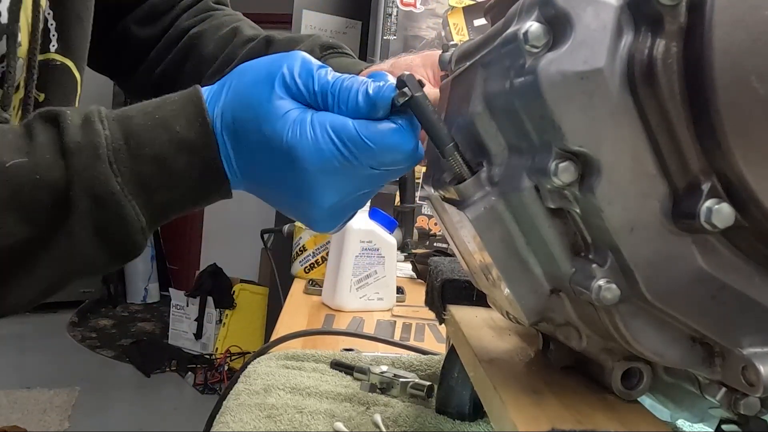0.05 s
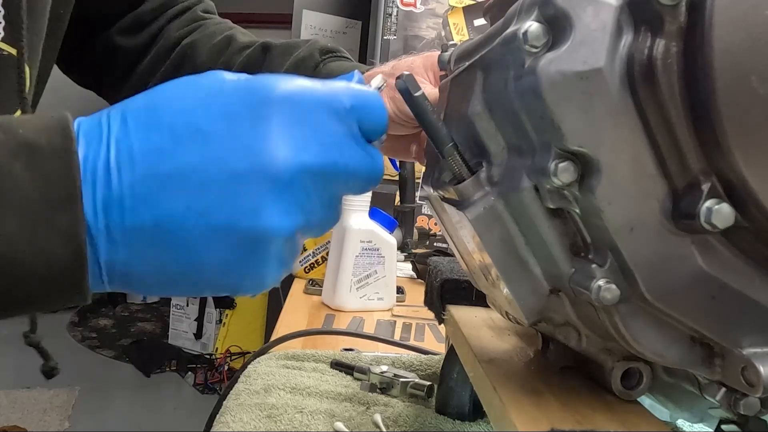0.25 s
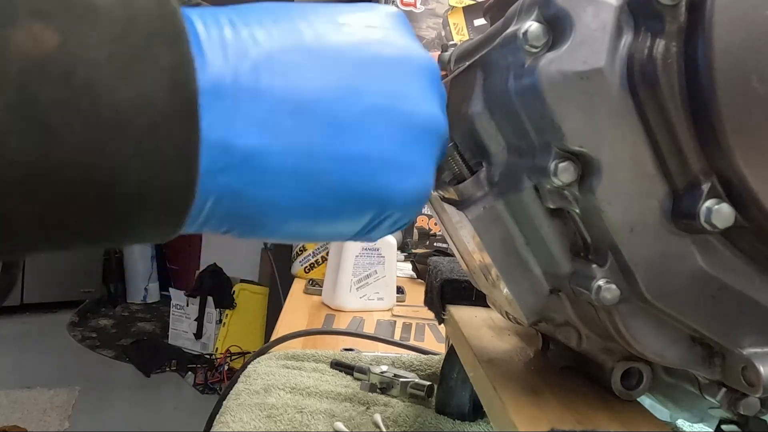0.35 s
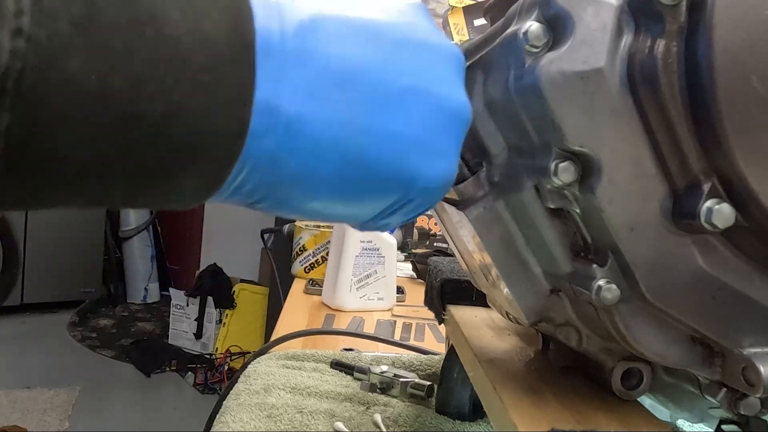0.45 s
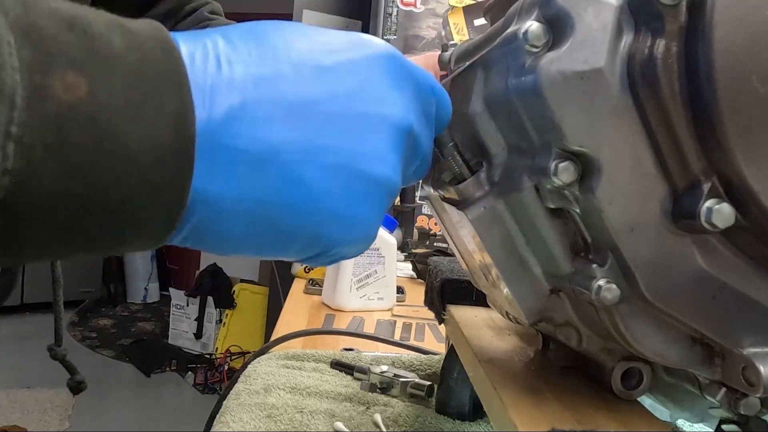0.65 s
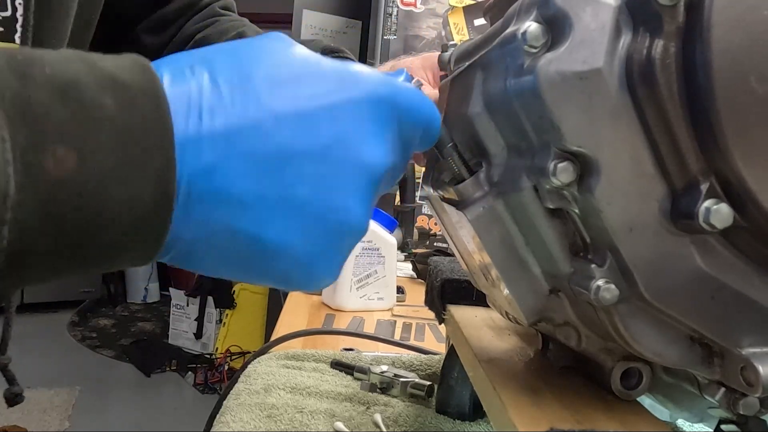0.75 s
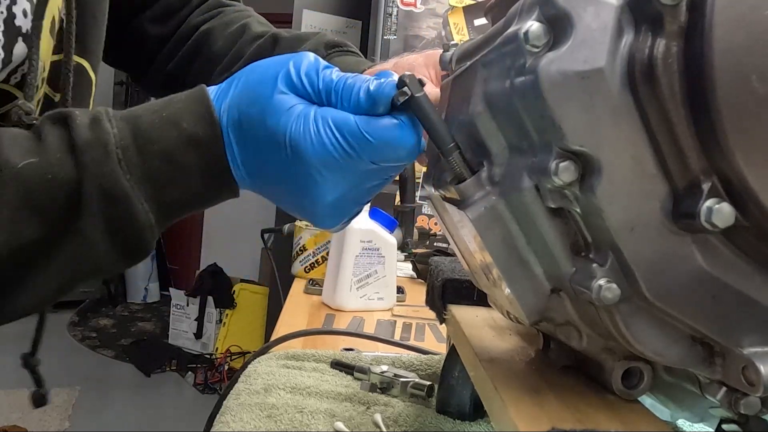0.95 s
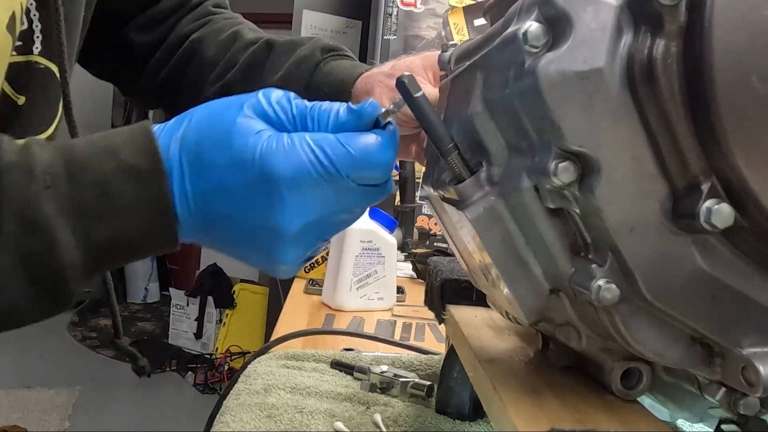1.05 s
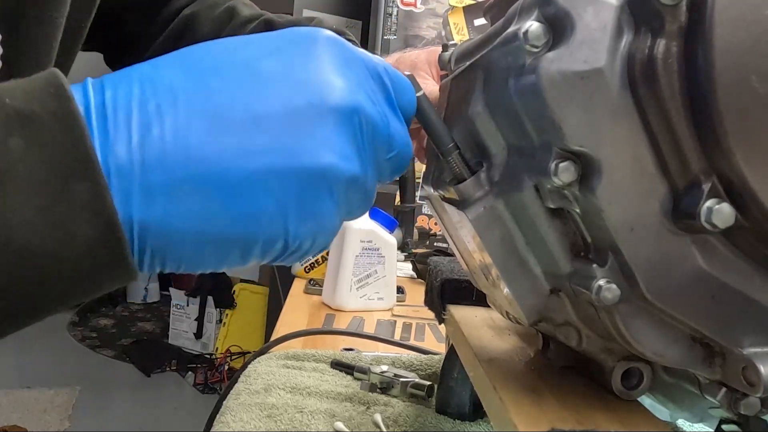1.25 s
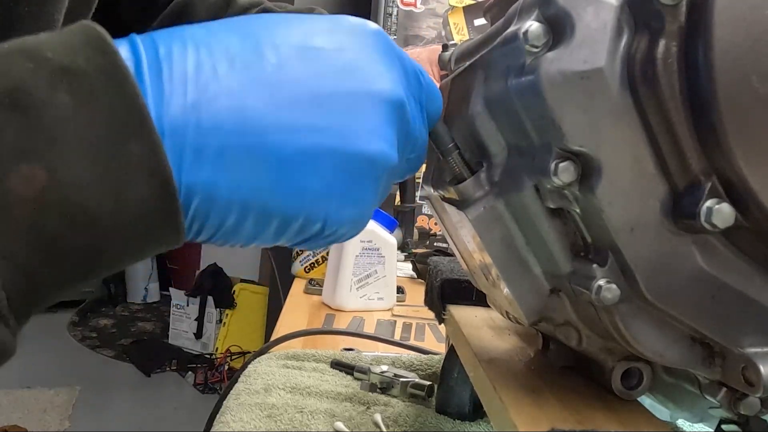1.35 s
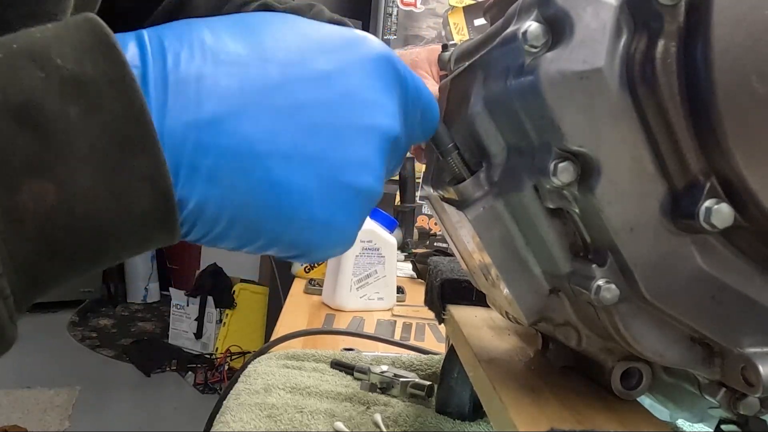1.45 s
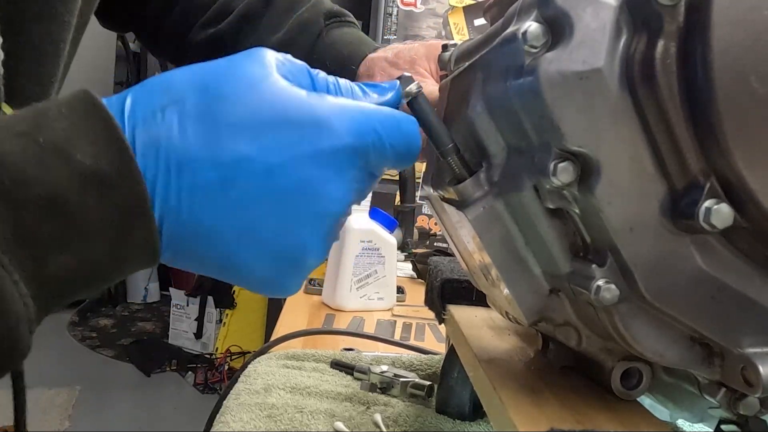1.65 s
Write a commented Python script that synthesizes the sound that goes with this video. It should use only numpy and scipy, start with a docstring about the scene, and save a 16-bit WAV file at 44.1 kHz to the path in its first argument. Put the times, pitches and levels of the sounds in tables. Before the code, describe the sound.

A steel tool clicks, scrapes and briefly squeaks as it turns in a metal casing.

```python
"""A small, quiet workshop: a gloved hand turns a steel tool in an aluminium engine casing on the bench.
Heard close up, the loose tool clicks against its seat, scrapes, skids, and squeaks as it sticks and slips;
the hand damps its ring. The casing answers with dull knocks and the shifting grip hisses softly.
Short room echo, faint air and a low rumble lie behind."""
import sys
import numpy as np
from scipy import signal
from scipy.fft import rfft, irfft, next_fast_len
from scipy.io import wavfile
from scipy.ndimage import uniform_filter1d, map_coordinates

SR = 44100
rng = np.random.default_rng(int(sys.argv[2]) if len(sys.argv) > 2 else 0)


def wav_out(sig):
    """Save sig, one row per channel (or a flat mono array), as 16-bit PCM at SR to the path in sys.argv[1]."""
    wavfile.write(sys.argv[1], SR, np.round(np.clip(np.atleast_2d(sig).T, -1, 1) * 32767).astype(np.int16))


N = 74970

# Spectrum of the contact crack. Each row: frequency in Hz, level in dB.
CRACK_SPECTRUM = [(300, -29.5), (1500, -22.5), (1950, -23.5), (2600, -14.5), (3450, -14.5), (5500, -4.5),
                  (7500, -0.5), (10000, 2), (12700, -1), (13600, -1.5), (15200, -3.5)]


def undb(db):
    """Decibels to gain."""
    return 10 ** (np.asarray(db) / 20)


def unit(x):
    """Scale to rms 1."""
    return x / np.sqrt(np.mean(x ** 2) + 1e-20)


def seconds(length_s):
    """Time axis."""
    return np.arange(int(length_s * SR)) / SR


def decay(t, t60_s):
    """Fall by 60 dB in t60_s."""
    return np.exp(-np.log(1000) * t / t60_s)


def colour(x, points):
    """Minimum-phase filter with the given (Hz, dB) response."""
    hz, db = np.array(points, float).T
    size = 2 * next_fast_len(len(x))
    bins_hz = np.maximum(np.fft.rfftfreq(size, 1 / SR), 1)
    cepstrum = irfft(np.log(undb(np.interp(np.log(bins_hz), np.log(hz), db))))
    cepstrum[1:size // 2] *= 2
    cepstrum[size // 2 + 1:] = 0
    return irfft(rfft(x, size) * np.exp(rfft(cepstrum)))[:len(x)]


def noise(points, size):
    """Coloured noise of rms 1."""
    return unit(colour(rng.standard_normal(size), points))


def walk(rate_hz, size):
    """Smooth random wander, spread near 1."""
    hold = max(int(SR / rate_hz), 1)
    return uniform_filter1d(np.repeat(rng.standard_normal(size // hold + 1), hold), hold)[:size]


def add(track, start_s, sound):
    """Mix a sound in at its time."""
    i = max(int(start_s * SR), 0)
    track[i:i + len(sound)] += sound[:max(N - i, 0)]


def tool_ring(t):
    """One tap on the hand-damped tool: modes alternate in sign, their weights vary from tap to tap."""
    # Each entry: mode frequency in Hz.
    modes_hz = [1470, 2660, 2930, 4230, 5650, 6470, 6965, 8070, 9050, 9720, 10550, 11400, 14450, 15330]
    # Each row, one per mode: level in dB, T60 in seconds.
    modes = [(-29, .018), (-22, .02), (-26, .018), (-21, .014), (-12, .008), (-8, .011), (-3, .022),
             (-6, .007), (-11, .008), (-11, .009), (-14, .009), (-5, .011), (-7, .007), (-7, .006)]
    scatter_db = 1.5 * rng.standard_normal(len(modes_hz))
    return sum((-1) ** k * undb(db + scatter_db[k]) * decay(t, t60_s) * np.sin(2 * np.pi * modes_hz[k] * t)
               for k, (db, t60_s) in enumerate(modes))


def contact(x, low_db, top_db):
    """Place and hardness of the contact favour the low or top modes; the slim tool radiates no bass."""
    thin = signal.sosfilt(signal.butter(3, 900, "high", fs=SR, output="sos"), x)
    return unit(colour(thin, [(4000, low_db), (6600, 0), (9800, top_db)]))


def clicks():
    """The tool takes up its play: a crack, a short ring, the struck spot's note, a quick rebound."""
    # Each row: start in seconds, level in dB, low modes in dB, top modes in dB,
    # note of the struck spot in Hz, rebound delay in ms, rebound gain in dB.
    taps = [(.2340, -40, 13, 17.5, 14200, 1.1, -5), (0.3492, -62, -6, -9, 7600, .7, 2),
            (0.3926, -32.5, -9.5, -7, 6384, .95, -3.5), (0.4133, -32.5, -6, -1.5, 7450, 1.1, -4),
            (0.4159, -46.5, 5.5, -5, 6580, 1.8, 24), (.4191, -40.5, 9.5, 10, 11310, 1.1, -34),
            (.4420, -36.5, -3, -6.5, 6240, .85, -2), (.5872, -30, 3, 1.5, 10940, 1.1, -23),
            (0.625, -42, 7.5, 7.5, 4140, 1.1, 2), (0.6674, -26, 0, 5.5, 8480, .65, -26.5),
            (1.1309, -46.5, 16.5, 7, 5950, .7, -27.5), (1.2374, -28, 4, 3, 10010, 1.1, 0),
            (1.2596, -36, 11, 5, 10250, 1.1, -1), (1.2795, -55, 9.5, 2.5, 4823, .7, -15),
            (1.4230, -41.5, -3, -7, 7570, .7, -18.5), (1.4432, -54.5, 4, 1.5, 11040, .6, -5)]
    out, t = np.zeros(N), seconds(.06)
    level_span_s = .005  # level = rms with all the energy in this span
    for start_s, db, low_db, top_db, seat_hz, rebound_ms, rebound_db in taps:
        crack = undb(-3) * unit(noise(CRACK_SPECTRUM, len(t)) * decay(t, t60_s=.011))
        seat = undb(-8.5) * unit(np.sin(2 * np.pi * seat_hz * t) * decay(t, t60_s=.017))
        tap = unit(tool_ring(t)) + crack + seat
        rebound = undb(rebound_db) * np.pad(tap, (int(rebound_ms / 1000 * SR), 0))[:len(t)]
        click = contact(tap + rebound, low_db, top_db)
        add(out, start_s, undb(db) * np.sqrt(level_span_s / t[-1]) * click)
    return out


def squeaks():
    """After a rough first bite, stick and slip lock briefly onto the tool's bending note."""
    # Each row: start in seconds, length in seconds, pitch in Hz, level in dB, overtones in dB, bite in dB.
    events = [(.2348, .023, 2738, -31, -19, -7), (.5772, .0115, 2745, -55, -21, -6),
              (1.1063, .026, 2920, -45, -12, -9), (1.2527, .0075, 2850, -48, -19, 0),
              (1.4149, .005, 2812, -39, -25, -8)]
    # Each row: frequency in Hz, level in dB.
    bite_spectrum = [(1250, -43), (1950, -25.5), (2420, 10), (2720, -4.5), (3060, -0.5), (3450, -12.5),
                     (6100, -38)]
    rise_s, fade_db_per_s, release_s, jitter = .0015, 280, .0015, .014
    out, t = np.zeros(N), seconds(.06)
    for start_s, length_s, hz, db, overtones_db, bite_db in events:
        phase = 2 * np.pi * np.cumsum(hz * (1 + jitter * walk(600, len(t)))) / SR
        release = np.exp(-np.maximum(t - length_s, 0) / release_s)
        envelope = np.minimum(t / rise_s, 1) * undb(-fade_db_per_s * t) * release
        slips = np.maximum(np.cos(phase), 0) ** 8 * rng.standard_normal(len(t))  # one burst per cycle
        overtones = undb(overtones_db) * unit(signal.fftconvolve(slips, tool_ring(t))[:len(t)])
        bite = undb(bite_db) * noise(bite_spectrum, len(t)) * decay(t, t60_s=.018)
        add(out, start_s, undb(db) * envelope * (np.sin(phase) + overtones + bite))
    return out


def scrapes():
    """Metal drags over metal: tiny catches grow until the tool lets go."""
    # Each row: start in seconds, length in seconds, level in dB, low modes in dB, top modes in dB.
    drags = [(0.2307, 0.0041, -45.5, 3.5, -38), (0.239, 0.016, -52, 14, 3), (0.4088, 0.0078, -39, -6, -6),
             (0.5626, 0.018, -57.5, 0.5, -11.5), (0.61, 0.016, -75, 7.5, -7.5),
             (0.7042, 0.011, -55.5, -12, -12), (1.089, .0045, -70.5, 13, -1),
             (1.1148, 0.016, -52, 12.5, 2.5), (1.249, 0.018, -41, 1, -11), (1.3672, 0.035, -64, 21.5, -5),
             (1.4372, 0.0099, -50.5, 8, 0.5)]
    catches_per_s, spread_db, swell_db = 5000, 4, 4.5
    out, t = np.zeros(N), seconds(.08)
    for start_s, length_s, db, low_db, top_db in drags:
        catches = (rng.random(len(t)) < catches_per_s / SR) * undb(spread_db * rng.standard_normal(len(t)))
        catches *= np.sign(rng.standard_normal(len(t)))
        catches *= (t < length_s) * undb(swell_db * np.minimum(t / length_s, 1))
        ring = unit(signal.fftconvolve(catches, tool_ring(t))[:len(t)])
        grit = undb(-.5) * unit(colour(catches, CRACK_SPECTRUM))
        add(out, start_s, undb(db) * np.sqrt(length_s / t[-1]) * contact(ring + grit, low_db, top_db))
    return out


def skids():
    """The tool skids to a stop: its rough chatter falls quickly in pitch."""
    # Each row: start in seconds, length in seconds, first pitch in Hz, last pitch in Hz, level in dB.
    glides = [(.4135, .0105, 7200, 3200, -43), (.606, .012, 6600, 3900, -54), (.625, .009, 2800, 2350, -57),
              (1.2535, .010, 3100, 2450, -45), (1.4235, .0105, 3050, 2100, -54)]
    width_hz = 1500
    out = np.zeros(N)
    for start_s, length_s, from_hz, to_hz, db in glides:
        t = seconds(length_s)
        phase = 2 * np.pi * np.cumsum(from_hz * (to_hz / from_hz) ** (t / length_s)) / SR
        chatter = walk(width_hz, len(t)) * np.cos(phase) + walk(width_hz, len(t)) * np.sin(phase)
        add(out, start_s, undb(db) * unit(chatter * np.sqrt(np.sin(np.pi * t / length_s))))
    return out


def casing_knocks():
    """The heavy casing, nudged on the bench, gives dull knocks."""
    # Each row: start in seconds, level in dB.
    nudges = [(0.305, -61.5), (0.41, -63), (0.669, -56), (0.7219, -63.5), (0.7483, -58), (1.1236, -49),
              (1.2367, -53), (1.2587, -72), (1.5098, -66.5)]
    # Each row: frequency in Hz, level in dB.
    casing_spectrum = [(100, -17.5), (300, -7), (620, -1.5), (850, 5), (1100, -11.5), (1600, -21.5),
                       (2500, -11), (6000, -61)]
    out, t = np.zeros(N), seconds(.15)
    envelope = decay(t, t60_s=.09) * (1 - np.exp(-t / .001))
    for start_s, db in nudges:
        add(out, start_s, undb(db) * noise(casing_spectrum, len(t)) * envelope)
    return out


def grip_slides():
    """A light, smooth rub as the grip shifts along the tool."""
    # Each row: start in seconds, length in seconds, centre in Hz, half-width in Hz, level in dB.
    rubs = [(0.202, 0.22, 4520, 1090, -62), (1.372, 0.048, 3905, 850, -59)]
    edge_s, fade_db_per_s = .022, 55
    out, t = np.zeros(N), seconds(.3)
    for start_s, length_s, hz, half_hz, db in rubs:
        band = [(hz / 2, -35), (hz - half_hz, -15), (hz, 0), (hz + half_hz, -15), (hz * 2, -24)]
        envelope = np.clip(np.minimum(t, length_s - t) / edge_s, 0, 1) * undb(-fade_db_per_s * t)
        add(out, start_s, undb(db) * envelope * noise(band, len(t)))
    return out


def workshop_echo(x):
    """Quick reflections from bench and casing, then the room's short tail; one response per ear."""
    # Each row: frequency in Hz, level in dB.
    echo_spectrum = [(210, -22), (1010, 0), (2710, 6), (4510, 0.5), (7100, -8), (10400, 0), (13100, -9),
                     (15900, -12.5)]
    early_db, tail_db = -12.5, -19
    out, t = [], seconds(.5)
    for _ in range(2):
        wash = noise(echo_spectrum, len(t))
        low = signal.sosfilt(signal.butter(2, 5000, fs=SR, output="sos"), wash)
        tail = (low * decay(t, t60_s=.21) + (wash - low) * decay(t, t60_s=.22)) * (t > .006)
        early = noise(echo_spectrum, len(t)) * decay(t, t60_s=.087) * (t > .0015)
        response = (undb(tail_db) * unit(tail) + undb(early_db) * unit(early)) / np.sqrt(len(t))
        out.append(signal.fftconvolve(x, response)[:N])
    return np.array(out)


def room_air():
    """Faint, wavering air, its lows and mids a little to the right."""
    # Each row: frequency in Hz, level in dB.
    air_spectrum = [(120, -3.5), (200, -24.5), (263, -21.5), (366, -8.5), (529, -14), (623, -13.5),
                    (836, -17.5), (1230, -23), (1940, -27.5), (2650, -23), (5330, -33.5), (12200, -32.5),
                    (16000, -26)]
    # Each row: time in seconds, gain in dB.
    air_swell = [(0, 6), (.12, 9.5), (.18, 6.5), (.3, 9.5), (.54, 3), (.85, 4.5), (1.02, 7), (1.2, 7.5),
                 (1.45, 5.5), (1.7, 4.5)]
    level_db = -73.5 + np.interp(np.arange(N) / SR, *np.array(air_swell).T)
    mid, side = noise(air_spectrum, N), .58 * noise(air_spectrum, N)
    left, right = np.array([mid - side, mid + side]) * undb(level_db + walk(8.4, N))
    return np.array([colour(left, [(1000, -2.5), (5000, .013)]),
                     colour(right, [(1000, 2.5), (5000, .013)])])


def rumble():
    """Low, uneven rumble, nearly the same in both ears."""
    # Each row: frequency in Hz, level in dB.
    rumble_spectrum = [(20, 1.5), (36, 8.5), (54, -7.5), (70, 4.5), (100, -8), (140, -26), (220, -29.5),
                       (400, -63.5)]
    # Each row: time in seconds, gain in dB.
    rumble_swell = [(0, 3), (.1, 8), (.17, -3), (.6, -0.5), (.72, -6), (.82, 8.5), (.94, -2), (1.05, 8),
                    (1.3, 0.5), (1.4, -6.5), (1.7, -4.5)]
    level_db = -62.5 + np.interp(np.arange(N) / SR, *np.array(rumble_swell).T)
    mid, side = noise(rumble_spectrum, N), .13 * noise(rumble_spectrum, N)
    return np.array([mid - side, mid + side]) * undb(level_db)


def scene():
    """The tool sits slightly right of centre: that ear hears it sooner, and its sharp sounds louder."""
    right_db, right_lead_ms = 3.8, .016
    sharp = clicks() + scrapes() + skids()
    mellow = squeaks() + casing_knocks() + grip_slides()
    left = sharp * undb(-right_db / 2) + mellow
    right = sharp * undb(right_db / 2) + mellow
    late_left = map_coordinates(left, [np.arange(N) - right_lead_ms / 1000 * SR], order=5)
    return np.array([late_left, right]) + workshop_echo(sharp + mellow) + room_air() + rumble()


def record(dry):
    """A steep low-pass cuts the very top."""
    return signal.sosfilt(signal.ellip(8, .2, 70, 15800, fs=SR, output="sos"), dry)


dry = scene()
out = record(dry)
wav_out(out)
```